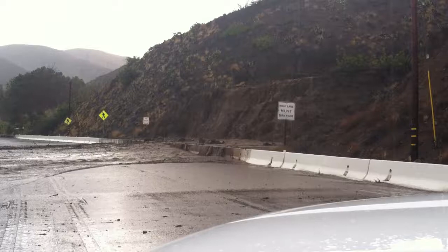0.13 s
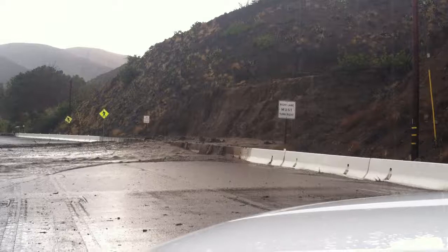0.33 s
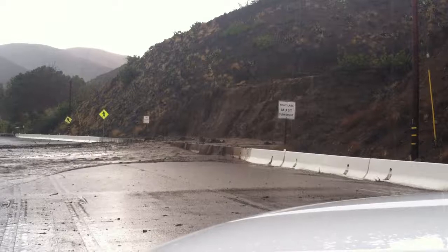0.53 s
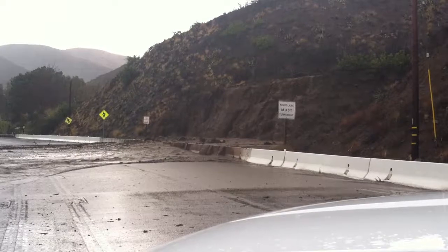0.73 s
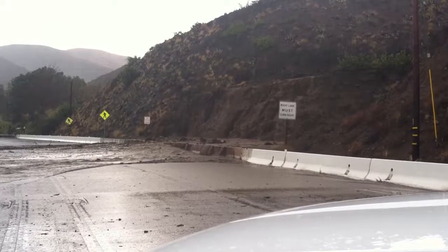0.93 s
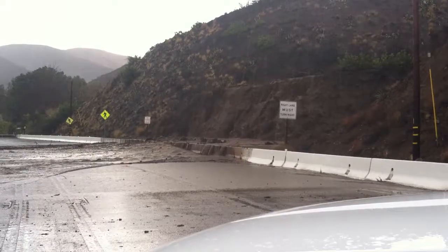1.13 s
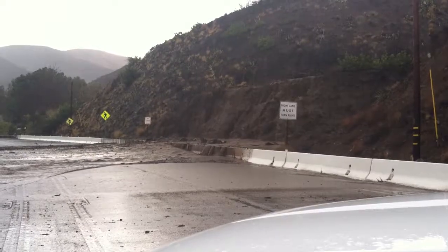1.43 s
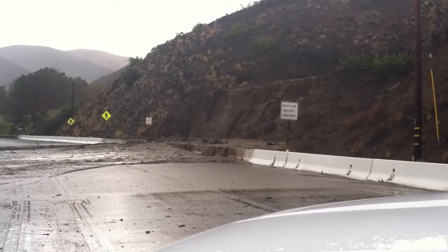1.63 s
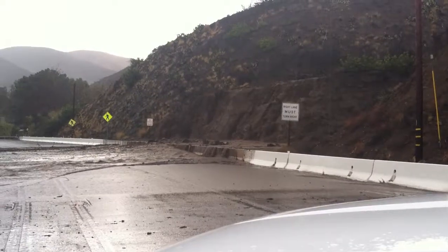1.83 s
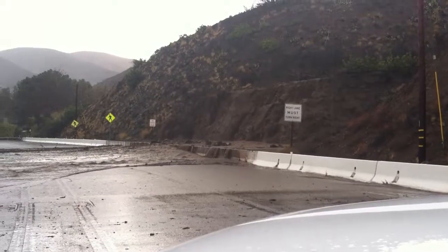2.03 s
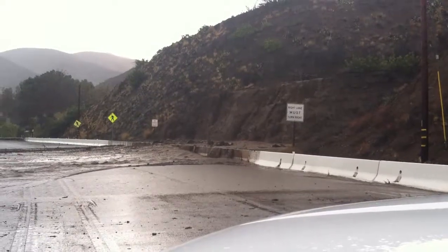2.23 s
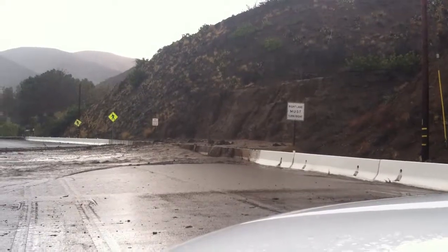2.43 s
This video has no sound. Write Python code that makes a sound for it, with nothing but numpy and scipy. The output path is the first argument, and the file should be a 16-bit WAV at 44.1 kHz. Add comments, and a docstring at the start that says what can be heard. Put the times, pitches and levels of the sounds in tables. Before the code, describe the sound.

Muddy flood water rushes steadily over a road, with bubbling, spray patter and low gurgles

```python
"""Muddy flood water pours across a road below a hillside, heard from beside a car. After a short silence the
rush cuts in at full strength: ringing bubbles, a patter of spray and a noise wash, with wavering sines as a low
drone beneath. Early on, one struck resonance ticks as a close droplet. The drone's tones swell now and again,
from about half a second to the end. The deep rumble rises until the middle, dips and returns."""
import sys
import numpy as np
from scipy import signal
from scipy.fft import rfft, irfft
from scipy.io import wavfile

SR = 44100
rng = np.random.default_rng(int(sys.argv[2]) if len(sys.argv) > 2 else 0)


def dump_mix(stems):
    """Bounce the given channels to the path in sys.argv[1] as a 16-bit WAV at rate SR."""
    frames = np.atleast_2d(stems).T  # one column per channel
    limited = np.clip(frames, -1, 1)  # hard clip at full scale
    pcm = np.round(limited * 32767).astype(np.int16)
    wavfile.write(sys.argv[1], SR, pcm)


N = 113337


def from_db(db):
    """Decibels to gain."""
    return 10 ** (np.asarray(db) / 20)


def rms_one(x):
    """Scale to an rms of one."""
    return x / np.sqrt(np.mean(x ** 2) + 1e-20)


def level(curve):
    """Gain at every sample, from points of time in seconds and level in dB."""
    return from_db(np.interp(np.arange(N) / SR, *np.transpose(curve)))


def drift(corner_hz):
    """Slow random motion with a spread of one: noise through two equal low-pass poles."""
    step = 40   # samples between the slow points
    pole = np.exp(-2 * np.pi * corner_hz * step / SR)
    noise = rng.standard_normal(N // step + 2002)
    slow = signal.lfilter([1], [1, -2 * pole, pole ** 2], noise)[2000:]   # skip the filter's start
    return np.interp(np.arange(N) / step, np.arange(len(slow)), rms_one(slow))


def sine(pitch_hz):
    """A sine of rms one that follows a moving pitch."""
    return np.sqrt(2) * np.sin(2 * np.pi * np.cumsum(pitch_hz) / SR)


def ring(clicks, hz, t60_s):
    """Each click strikes a resonance: a decaying sine, near the click's height, down 60 dB after t60_s."""
    radius = np.exp(-np.log(1000) / (t60_s * SR))
    turn = 2 * np.pi * hz / SR
    return signal.lfilter([0, np.sin(turn)], [1, -2 * radius * np.cos(turn), radius ** 2], clicks + 1e-18)


def grains(per_s, spread_db):
    """Clicks at random times and of either sign, many small and a few large."""
    boost_db = spread_db * np.minimum(rng.exponential(1, N), 4.5)
    sizes = from_db(boost_db) * rng.choice([-1, 1], N)
    return sizes * (rng.random(N) < per_s / SR)


# Tone colour of the rushing water. Each row: frequency in Hz, relative spectrum level in dB.
WATER_COLOUR = [(25, -36), (50, -39), (100, -18.5), (155, -1.5), (300, -2.6), (410, -6), (480, -9.5),
                (620, -5.5), (780, -5), (900, -6), (1100, -10.5), (1550, -5.5), (1930, -9.5), (2280, -2.5),
                (2500, -3), (2720, -5.5), (2830, -1.1), (3090, -1.74), (3220, -5.5), (3400, -10.5),
                (3700, -9), (3950, -10.5), (4230, -15.5), (4850, -11.5), (5600, -16.5), (6250, -24.5),
                (8700, -23.5), (10000, -31), (11700, -43), (12500, -52)]


def water_colour(x):
    """Filter a sound with the water's spectrum, interpolated over log frequency; rms one."""
    hz, db = np.transpose(WATER_COLOUR)
    bins_hz = np.maximum(np.fft.rfftfreq(2 * N, 1 / SR), 1)
    gain = from_db(np.interp(np.log(bins_hz), np.log(hz), db))
    return rms_one(irfft(rfft(x, 2 * N) * gain)[:N])


BUBBLE_DB, BUBBLES_PER_S, BUBBLE_SPREAD_DB = -37, 6000, 2.5
BUBBLE_LOW_HZ, BUBBLE_HIGH_HZ = 399.4, 5540
BUBBLE_CYCLES = 15.8   # cycles until a ring has fallen 60 dB


def bubbles(count=40):
    """Bubbles of many sizes close at random; each rings at its own pitch, the lower the longer."""
    clicks = grains(BUBBLES_PER_S, BUBBLE_SPREAD_DB)
    dealt = rng.integers(0, count, N)   # which pitch each click strikes
    rings = np.zeros(N)
    for k, hz in enumerate(np.geomspace(BUBBLE_LOW_HZ, BUBBLE_HIGH_HZ, count)):
        rings += ring(clicks * (dealt == k), hz, BUBBLE_CYCLES / hz)
    return from_db(BUBBLE_DB) * water_colour(np.diff(rings, prepend=0))


SPRAY_DB, SPRAY_PER_S, SPRAY_SPREAD_DB, SPRAY_LOW_HZ = -42.5, 2500, 2, 1730


def spray():
    """Fine drops fall back on the water: dense high-passed clicks, a bright patter."""
    high_pass = signal.butter(2, SPRAY_LOW_HZ, "high", fs=SR, output="sos")
    patter = signal.sosfilt(high_pass, grains(SPRAY_PER_S, SPRAY_SPREAD_DB))
    return from_db(SPRAY_DB) * water_colour(patter)


WASH_DB, WASH_FLUTTER_DB, FLUTTER_HZ = -32.5, 0.55, 37
RUMBLE_HZ, CHURN_HZ = 131, 402   # upper edges of the two lowest bands
# Balance of the deep rumble in the wash. Each row: time in seconds, relative level in dB.
RUMBLE_LEVEL = [(.12, -3.5), (.6, -1.5), (1.1, 2.5), (1.5, 3.5), (1.85, -3), (2.15, 5), (2.57, 2.5)]
# Balance of the low churning above the rumble. Each row: time in seconds, relative level in dB.
CHURN_LEVEL = [(.12, -1), (.45, -2), (.8, 0), (1.03, -1.5), (1.4, 0), (1.7, 1.5), (2.05, -.3), (2.3, 1),
               (2.57, -1.5)]


def wash():
    """The far churning: noise split into rumble, churn and the octaves above, each fluttering on its own."""
    white = rfft(rng.standard_normal(N))
    bins_hz = np.fft.rfftfreq(N, 1 / SR)
    # 0 is the rumble, 1 the churn, 2 and up the octaves
    band = np.ceil(np.log2(np.maximum(bins_hz / CHURN_HZ, 1))) + (bins_hz > RUMBLE_HZ)
    bands = []
    for k in np.unique(band):
        flutter = from_db(WASH_FLUTTER_DB * drift(FLUTTER_HZ))
        bands.append(irfft(white * (band == k), N) * flutter)
    rumble, churn, *octaves = bands
    roar = rumble * level(RUMBLE_LEVEL) + churn * level(CHURN_LEVEL) + sum(octaves)
    return from_db(WASH_DB) * water_colour(roar)


SWELL_WANDER_HZ, SWELL_WANDER_RATE_HZ = 4.06, 14
# Swells of the drone's low tones. Each row: middle in seconds, full length in seconds, pitch in Hz, rms level
# in dB at the top of the swell.
DRONE_SWELLS = [(0.543, .11, 180, -43), (0.602, 0.23, 320, -41.5), (0.822, .1, 173.3, -44),
                (.83, .1, 287.6, -40), (0.886, 0.074, 317.8, -42), (1.085, 0.12, 179, -40),
                (1.23, 0.061, 331.3, -41), (1.308, 0.089, 182.4, -45), (1.49, .11, 180, -42),
                (1.54, .1, 318, -43), (1.695, 0.23, 180, -43), (2.046, 0.092, 167.2, -41.5),
                (2.382, 0.1, 297, -45)]


def drone_swells():
    """The drone's low tones swell up now and again and sink back, unsteady in pitch."""
    t, out = np.arange(N) / SR, np.zeros(N)
    for middle, length, hz, db in DRONE_SWELLS:
        swell = np.cos(np.pi * np.clip((t - middle) / length, -.5, .5)) ** 2
        pitch_hz = hz + SWELL_WANDER_HZ * drift(SWELL_WANDER_RATE_HZ)
        out += from_db(db) * swell * sine(pitch_hz)
    return out


DROPLET_HZ, DROPLET_T60_S = 8000, .0013
DROPLET_LOW_HZ, DROPLET_HIGH_HZ = 6300, 9700   # band-pass edges
# A close droplet. Each row: time in seconds, strike level in dB ahead of the resonance and band-pass.
DROPLETS = [(.3288, -25)]


def droplets():
    """A near drop lands with a tiny high tick: a very short band-passed ring."""
    clicks = np.zeros(N)
    for s, db in DROPLETS:
        clicks[int(s * SR)] = from_db(db)
    band_pass = signal.butter(2, [DROPLET_LOW_HZ, DROPLET_HIGH_HZ], "band", fs=SR, output="sos")
    return signal.sosfilt(band_pass, ring(clicks, DROPLET_HZ, DROPLET_T60_S))


DRONE_WAVER_DB, DRONE_WAVER_HZ = 3.5, 11.4
# Tones of the low drone. Each row: pitch in Hz, pitch wander in Hz, middle level in dB around which it wavers.
DRONE_TONES = [(180, 2.9, -56.5), (285, 7.86, -56), (321.6, 2.2, -52)]


def drone():
    """Low sines that waver in strength and pitch, perhaps the idling car."""
    out = np.zeros(N)
    for hz, wander_hz, db in DRONE_TONES:
        strength = from_db(db + DRONE_WAVER_DB * drift(DRONE_WAVER_HZ))
        out += strength * sine(hz + wander_hz * drift(DRONE_WAVER_HZ))
    return out


# Strength of the flow. Each row: time in seconds, level in dB.
FLOW_LEVEL = [(.12, -0.04), (.7, 0), (1.1, 0), (1.9, 0.36), (2.57, 0)]


def scene():
    """The flow drives bubbles, spray and wash together; the drone's swells, droplet and drone are added to it."""
    water = level(FLOW_LEVEL) * (bubbles() + spray() + wash())
    return (water + drone_swells() + droplets() + drone())[None]


START_S, CUTOFF_HZ = .12, 12100


def record(dry):
    """The sound cuts in abruptly; a steep elliptic low-pass takes off the top."""
    live = np.arange(N) / SR >= START_S
    low_pass = signal.ellip(10, .1, 80, CUTOFF_HZ, fs=SR, output="sos")   # ripple, then stop depth in dB
    return signal.sosfilt(low_pass, dry * live)


dry = scene()
out = record(dry)
dump_mix(out)
```